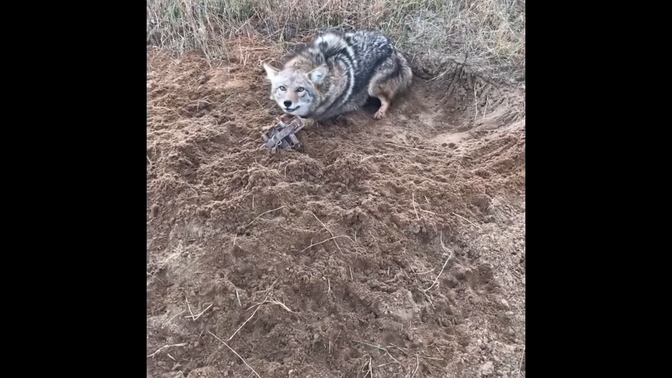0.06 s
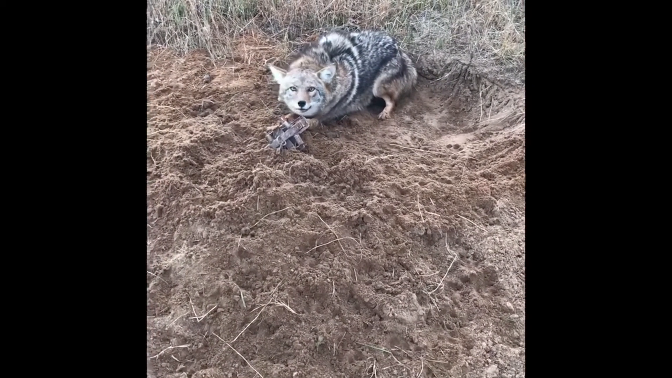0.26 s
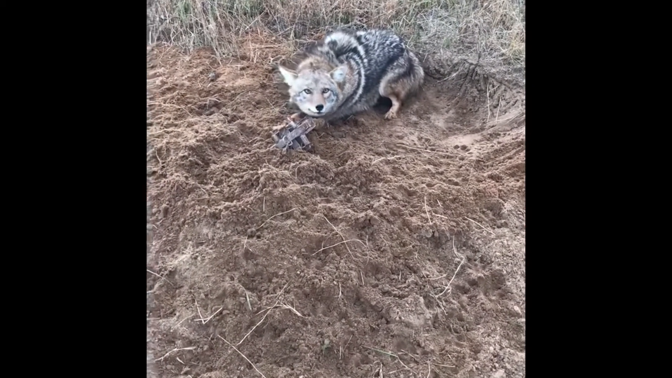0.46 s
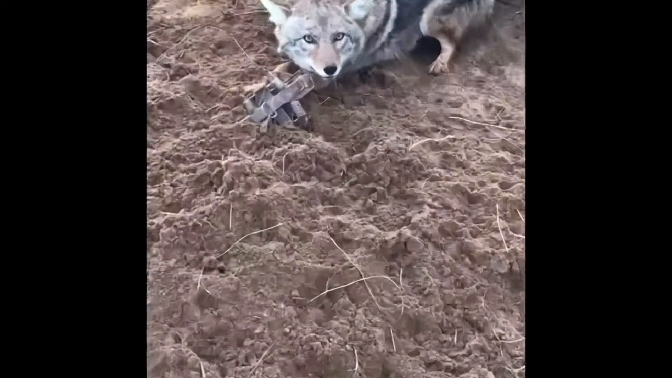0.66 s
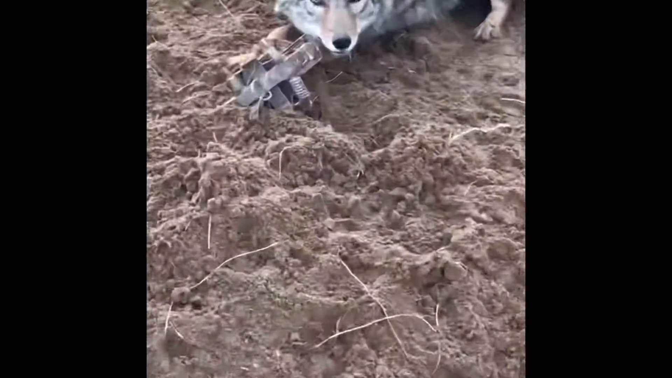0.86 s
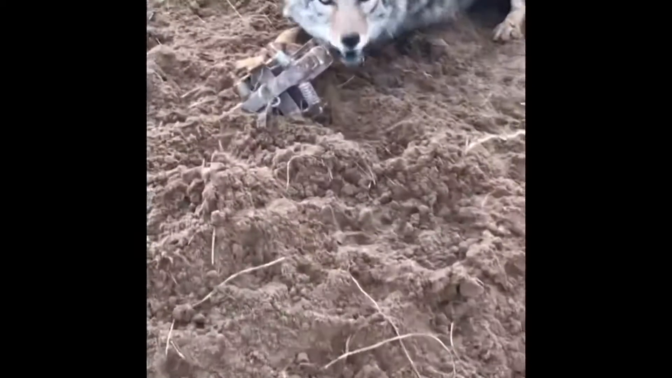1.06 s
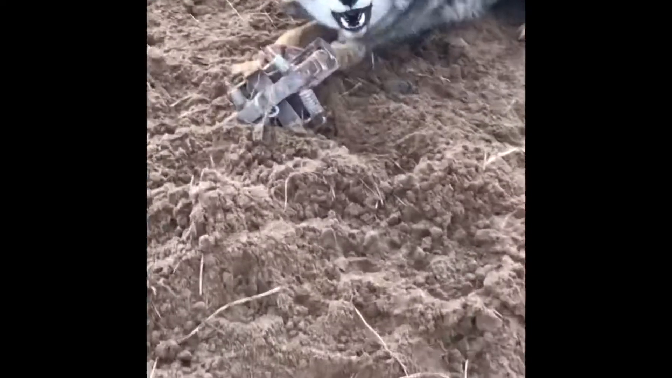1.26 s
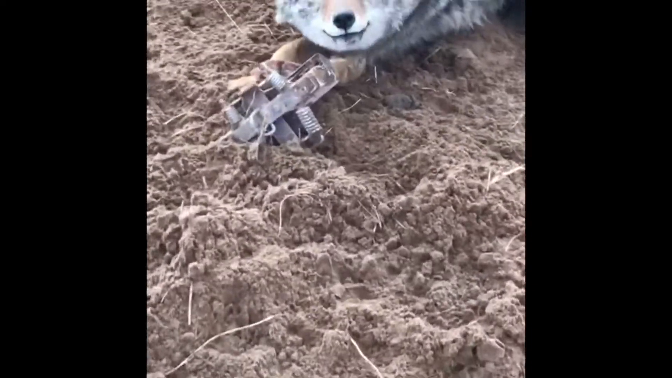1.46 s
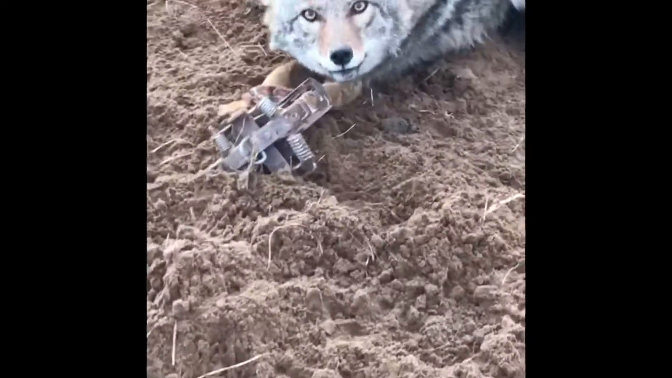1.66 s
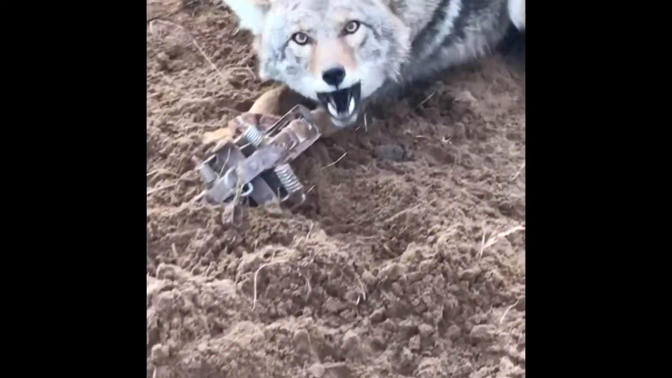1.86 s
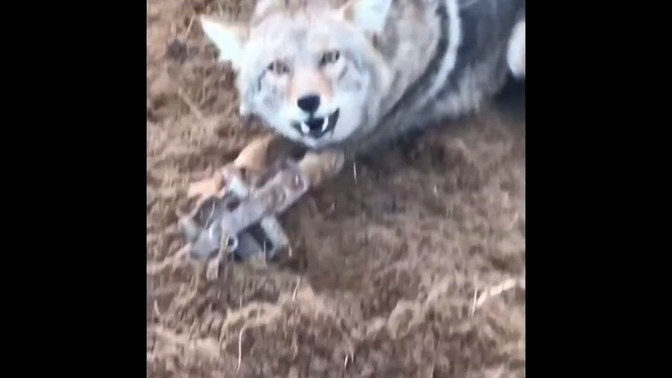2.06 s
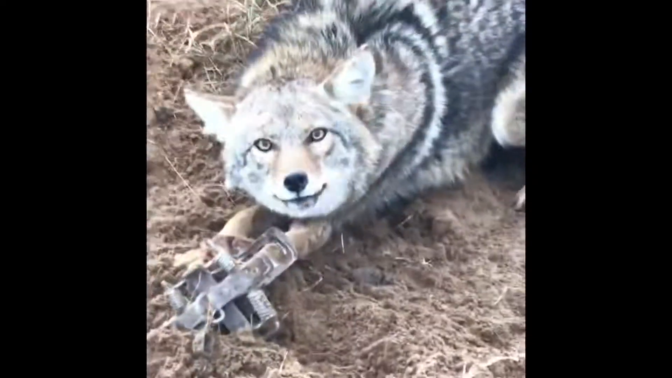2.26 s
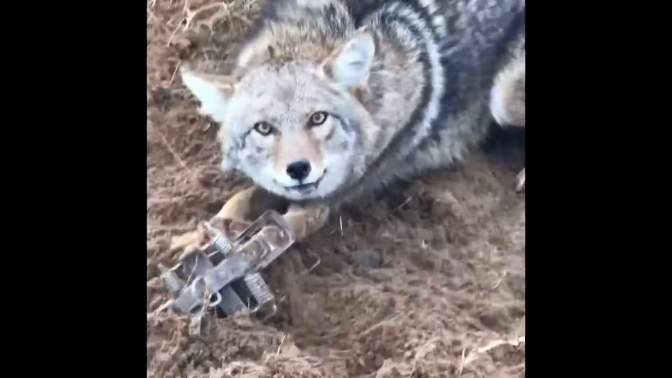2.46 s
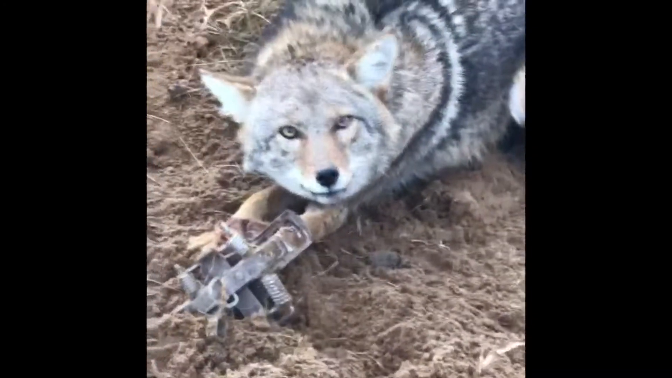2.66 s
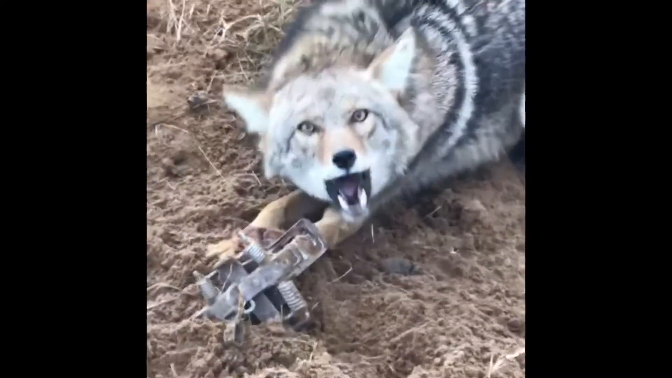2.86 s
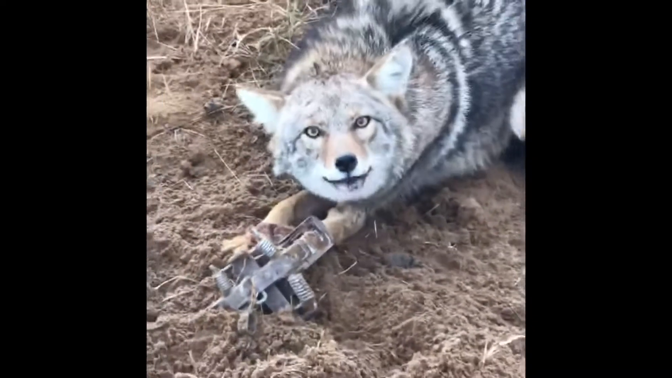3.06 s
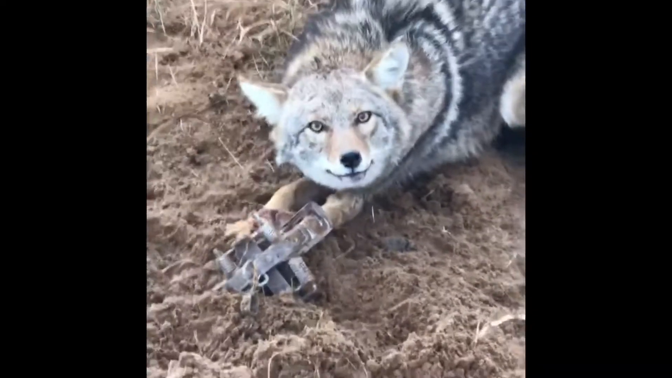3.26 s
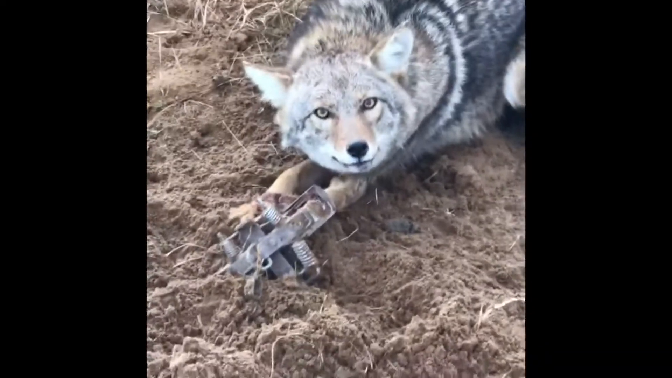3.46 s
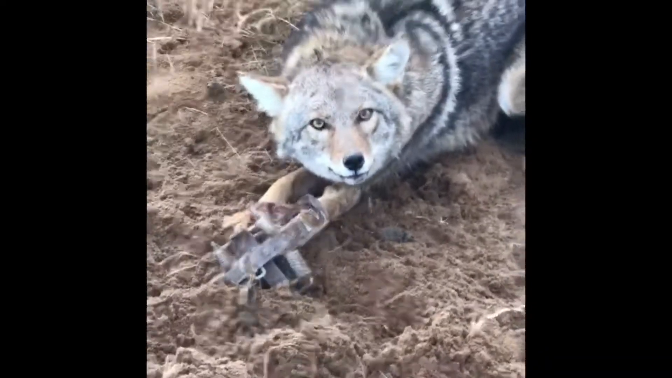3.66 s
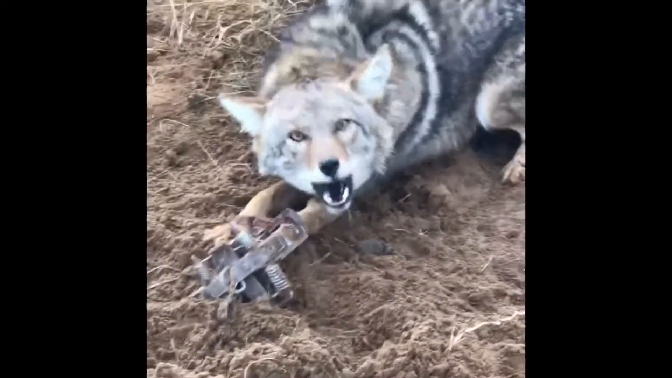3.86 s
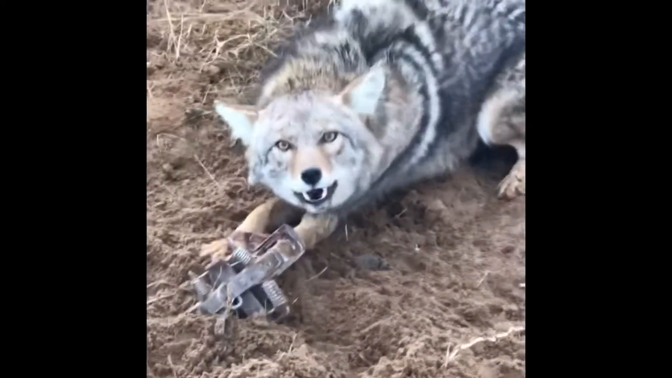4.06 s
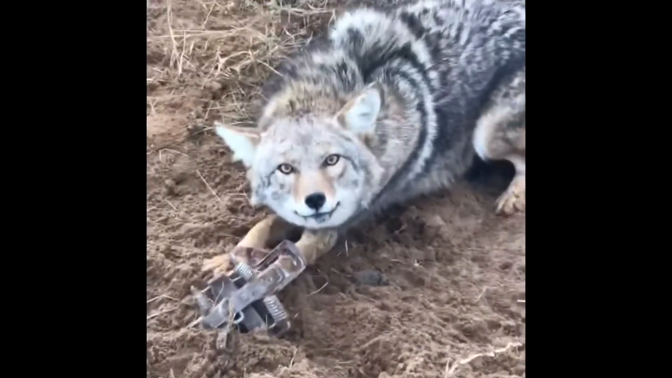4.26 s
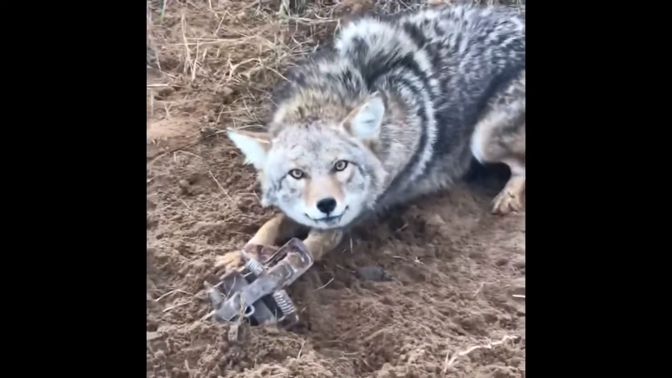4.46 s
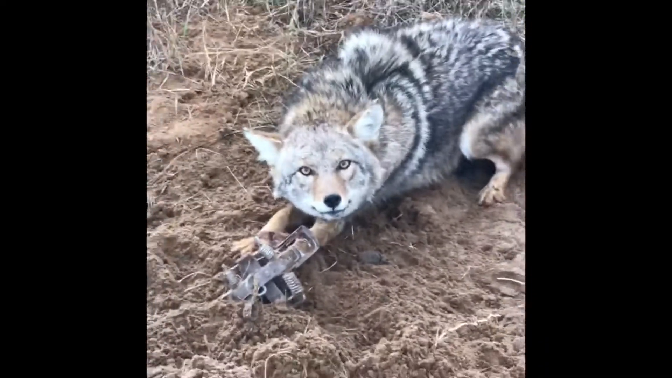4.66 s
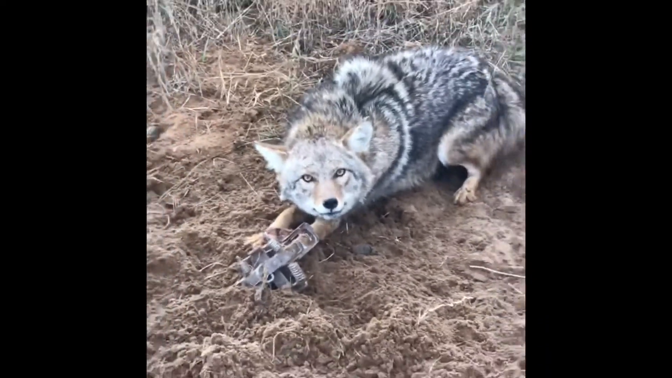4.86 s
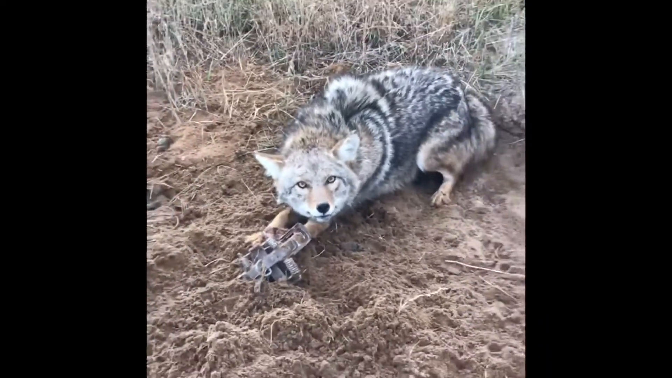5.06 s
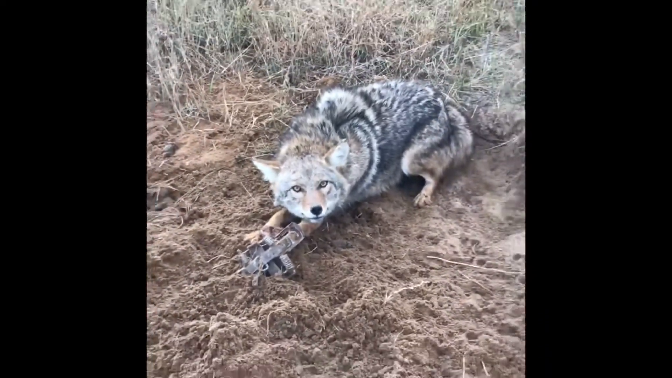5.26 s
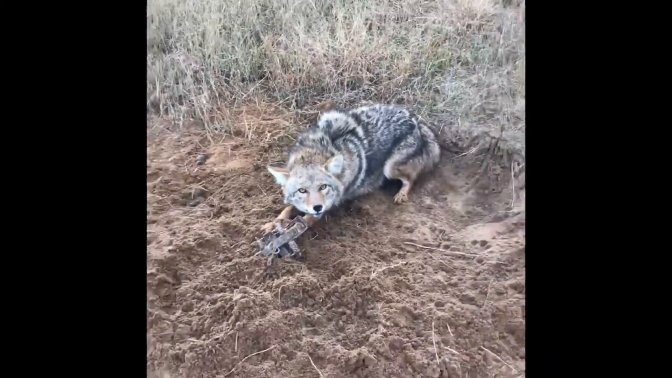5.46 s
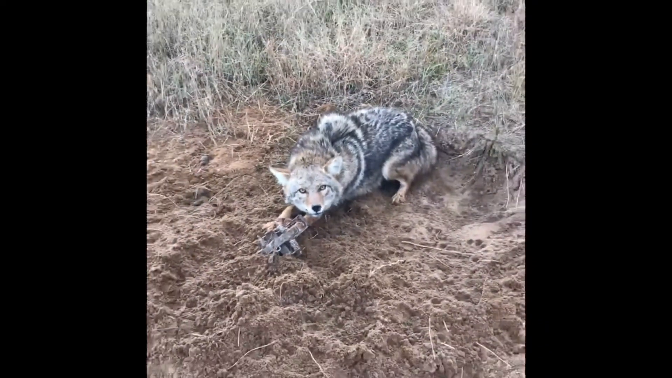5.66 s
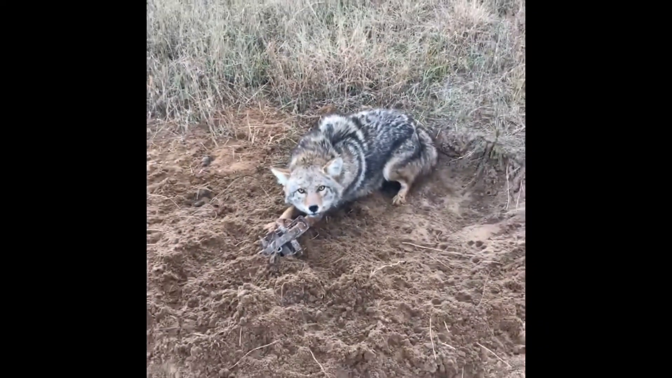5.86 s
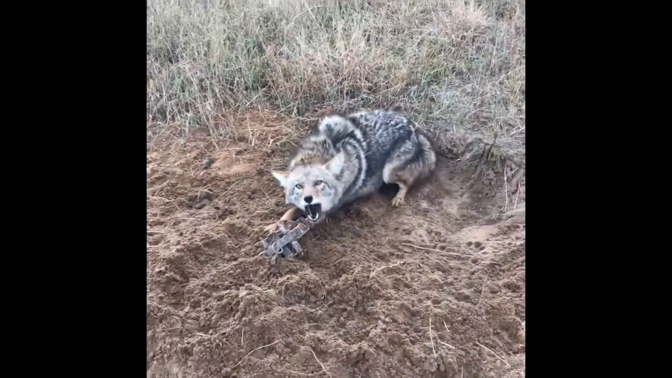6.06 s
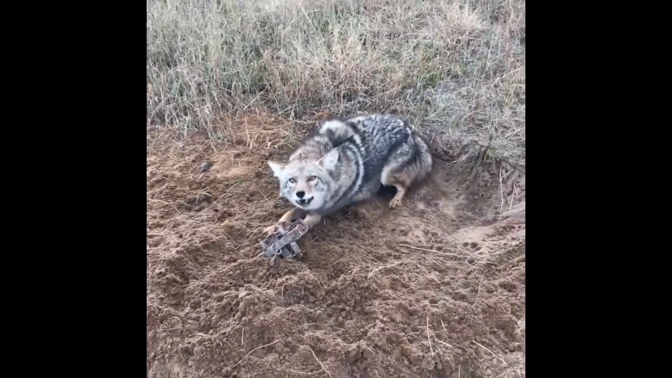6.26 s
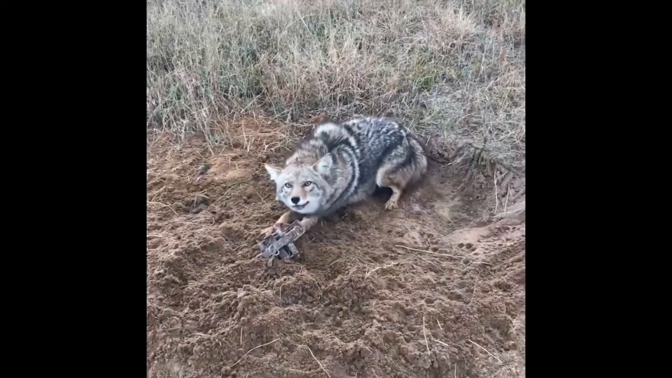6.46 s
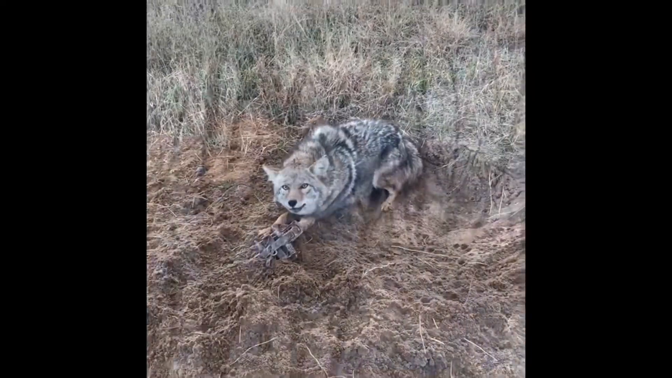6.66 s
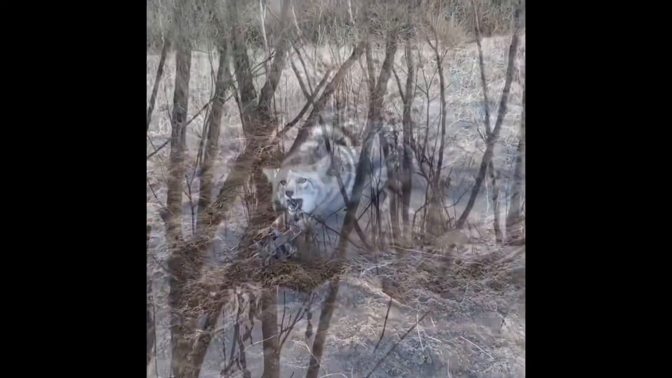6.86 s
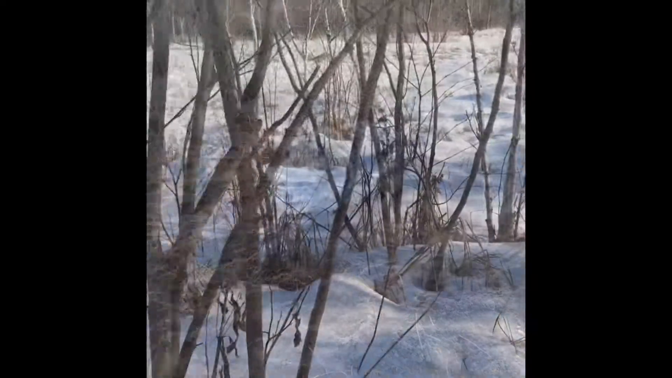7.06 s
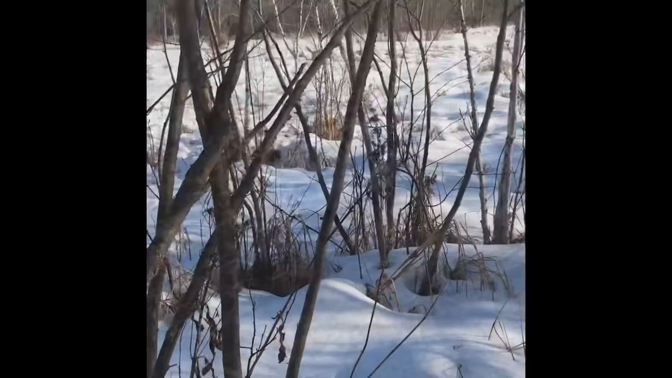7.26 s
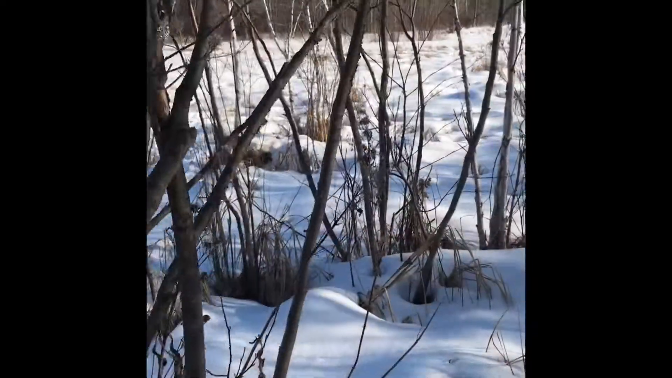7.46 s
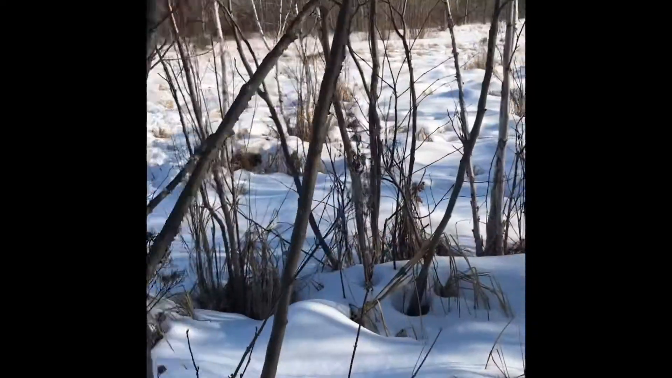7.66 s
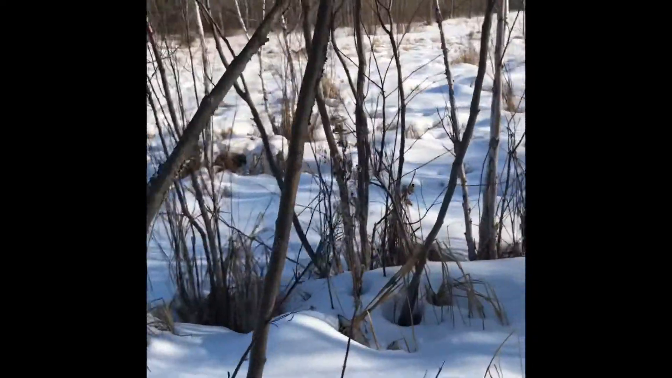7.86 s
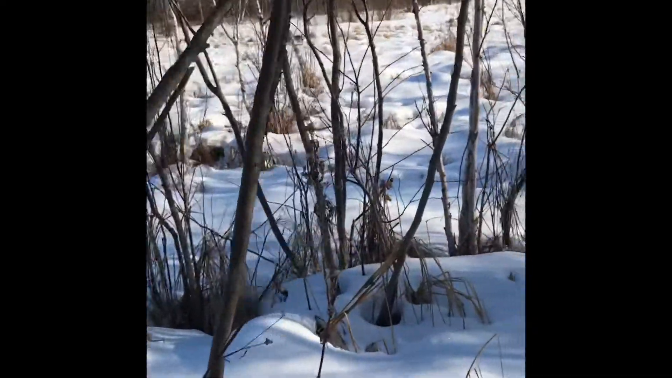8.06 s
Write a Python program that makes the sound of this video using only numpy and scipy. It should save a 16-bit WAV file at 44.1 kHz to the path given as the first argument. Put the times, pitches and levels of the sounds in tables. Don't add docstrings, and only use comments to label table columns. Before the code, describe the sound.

A trapped coyote close to a hand-held phone in an open field barks six times, each a brief yelping burst, first hoarse, then clearer, later hoarse again. Very quiet chesty growls and small throat creaks fill the gaps. Far road roar, low wind and faint dry grass dip at each bark. A strong air puff thumps the microphone after the first bark. Finally the field fades and snow crust crunches with snapping twigs.

```python
import sys
import numpy as np
from scipy import signal
from scipy.fft import rfft, irfft
from scipy.io import wavfile
from scipy.ndimage import uniform_filter1d

SR = 44100
rng = np.random.default_rng(int(sys.argv[2]) if len(sys.argv) > 2 else 0)


def digitize_waveform(pressure):
    field = np.atleast_2d(pressure).T
    bounded = np.clip(field, -1, 1)
    quanta = np.round(bounded * 32767).astype(np.int16)
    wavfile.write(sys.argv[1], SR, quanta)


def decibels_to_gain(level_db):
    exponent = np.asarray(level_db, float) / 20
    return 10 ** exponent


N = 357647

# start in seconds, length in seconds, effort in dB, highest pitch in Hz, hoarseness (0-1).
BARK_EVENTS = [
    (1.047, .17, -8, 449.3, 0.96),
    (1.811, 0.19, -10, 478.8, .13),
    (2.715, .18, -11.5, 478, 0.02),
    (3.81, 0.17, -11, 437.8, 0),
    (5.989, .17, -8, 472, .75),
    (6.698, 0.18, -13.5, 458.4, .17),
]


def evened(x):
    return x / np.sqrt(np.mean(x ** 2) + 1e-20)


def add(mix, s, sound):
    part = mix[round(s * SR):][:len(sound)]
    part += sound[:len(part)]


def smooth(x, s):
    size = max(round(s * SR), 1)
    return uniform_filter1d(uniform_filter1d(x, size), size)


def course(table, share):
    at, *columns = np.transpose(table)
    return np.array([smooth(np.interp(share, at, c), 0.001) for c in columns])


def level_curve(table):
    s, db = np.transpose(table)
    return np.interp(np.arange(N) / SR, s, db)


def tents(rows):
    t = np.arange(N) / SR
    total = np.zeros(N)
    for s, db, rise, fall in rows:
        below = np.where(t < s, (s - t) / max(rise, .003), (t - s) / max(fall, .003))
        total += decibels_to_gain(db - 20 * below)
    return total


def resonate(x, hz, width_hz):
    turn = np.exp(2j * np.pi * np.cumsum(hz * np.ones(len(x))) / SR)
    r = np.exp(-np.pi * width_hz / SR)
    return 2 * (turn * signal.lfilter([1 - r], [1, -r], x / turn)).real


def narrow(x, hz, width_hz):
    return resonate(resonate(x, hz, width_hz), hz, width_hz)


def colour(x, spectrum):
    f, db = np.transpose(spectrum)
    hz = np.fft.rfftfreq(len(x), 1 / SR)
    gain = decibels_to_gain(np.interp(np.log(hz + 1), np.log(f), db))
    return evened(irfft(rfft(x) * gain, len(x)))


def patchy_noise(patchy_db, flicker_db):
    frames = N // 128 + 8
    a, b, patches = rng.standard_normal((frames, 257, 3)).T
    patches = evened(uniform_filter1d(uniform_filter1d(patches, 5, 0), 24, 1))
    flicker = evened(uniform_filter1d(rng.standard_normal(frames), 12))
    frames_out = (a + 1j * b) * decibels_to_gain(patchy_db * patches + flicker_db * flicker)
    return signal.istft(frames_out, nperseg=512, noverlap=384)[1][256:N + 256]


def pulses(hz, rough, jitter, shimmer_db):
    a, b = rng.standard_normal((2, len(hz)))
    turns = np.cumsum(hz * (1 + jitter * rough * evened(smooth(a, .0016)))) / SR
    train = sum(np.cos(2 * np.pi * k * turns) * (k * hz < 16000) for k in range(1, 56))
    return turns, evened(train) * decibels_to_gain(shimmer_db * rough * evened(smooth(b, 0.0025)))


def bark(length, effort_db, top_hz, hoarse):
    # Hz, width in Hz, level in dB, how far it follows the mouth,
    # dB lost per dB of weaker effort.
    throat = [(620, 250, -1, 1.0, .01), (1170, 340, 2.5, .18, .04), (1740, 440, -4.5, .3, .06),
              (2330, 520, -6, .08, .3)]
    # Hz, width in Hz, level in dB,
    # how far it follows the pitch, dB lost per dB of weaker effort.
    upper = [(3023, 290, -22, .1, 1.3), (4140, 610, -23.5, 0.31, 1), (6404, 760, -22, .4, 0.5),
             (8620, 1220, -23, 0.37, 1.27), (10300, 900, -33, 0.37, 0.8), (11400, 1600, -36, .1, 1.85),
             (13600, 2100, -30.5, .1, 3)]
    # share of length, level in dB against effort, share of top pitch, mouth opening factor.
    clear_course = [(0, -51, .55, .6), (.13, -16.5, .64, .72), (.2, -4.5, .73, .87), (.37, -1, .9, .96),
                    (.47, 0.5, 0.98, 1.15), (.57, 1.5, .93, 1.3), (.72, 0, .7, 1.18),
                    (.81, -19.5, .63, 1.25), (1, -48, .63, 1.1)]
    hoarse_course = [(0, -52, .66, .68), (.1, -12, .8, .6), (.21, -3.5, .93, .85), (.33, -2.5, .99, .93),
                     (.42, 0.84, 1, 1.01), (.56, -1, .94, 1.05), (.74, -6, .8, 1.15), (.84, -24, .7, 1.2),
                     (1, -62, .66, 1.4)]
    voicing = [(0, .65, .7, .4, .4), (.2, .5, .85, .35, .6), (.38, .4, .65, .5, .95),
               (.46, .03, .12, .45, .95), (.63, .02, .05, .55, .6), (.7, .25, .2, .35, .55),
               (.83, .75, .2, .8, .2), (1, .9, .1, .98, .1)]

    t = np.arange(0, length, 1 / SR)
    share = t / length
    hoarse = np.clip(hoarse, 0, 1)
    clear_part = (1 - hoarse) * course(clear_course, share)
    under_db, pitch, mouth = clear_part + hoarse * course(hoarse_course, share)
    level_db, hz = effort_db + under_db, top_hz * pitch

    delay = .55 * min(hoarse, .2) * np.exp(-((share - .5) / .1) ** 2)
    clear_rough, clear_second, hoarse_rough, hoarse_second = course(voicing, share - delay)
    rough = clear_rough + hoarse * (hoarse_rough - clear_rough)
    second = clear_second + hoarse ** 4 * (hoarse_second - clear_second)

    turns, folds = pulses(hz, rough, jitter=.17, shimmer_db=10.0)
    breaking = .9 * (1 - hoarse) * np.exp(-((share - .69) / .045) ** 2)
    first_hz = throat[0][0]
    locked = pulses(first_hz * np.minimum(mouth, 1.08), rough, jitter=.07, shimmer_db=5.5)[1]
    breath = evened((0.94 + np.exp(-(turns % 1) / .3)) * rng.standard_normal(len(t)))
    locked = .35 * locked + narrow(locked, first_hz * mouth, width_hz=400)
    drive = (1 - .5 * second) * (1 + breaking * np.cos(np.pi * turns)) * folds
    drive = drive + 0.76 * second * locked + 1.7 * rough * breath

    voice = -decibels_to_gain(-3.5 - 24 * (mouth - 0.7951)) * narrow(folds, hz, width_hz=170)
    for k, (f_hz, width_hz, db, follows, fades) in enumerate(throat):
        ring_db = db + fades * (level_db - 13.5)
        if k == 3:
            ring_db = ring_db + 15 * (mouth - 1.01)
        sign = -1 if k >= 2 else 1
        voice -= sign * decibels_to_gain(ring_db) * narrow(drive, f_hz * mouth ** follows, width_hz)
    loudness = np.sqrt(smooth(voice ** 2, 0.009) + 1e-9)
    voice = voice / loudness
    voice = voice - .24 * voice ** 2
    voice = signal.sosfilt(signal.butter(5, 228, "high", fs=SR, output="sos"), voice)
    voice = signal.sosfiltfilt(signal.butter(3, 2800, fs=SR, output="sos"), voice)

    larynx = np.clip(np.interp(t - .015, t, hz), 330, 470) / 400
    bright_drive = 0.86 * drive + (0.42 + 0.31 * rough) * breath
    weaker_db = np.maximum(level_db + 8.5, np.where(t > length / 2, -12, -60))
    for f_hz, width_hz, db, follows, fades in upper:
        patches_db = 2.9 * evened(smooth(rng.standard_normal(len(t)), 0.0084))
        ring = narrow(bright_drive, f_hz * larynx ** follows, width_hz)
        dull_db = -5.5 * hoarse * max(np.log2(f_hz / 4000), 0)
        voice -= decibels_to_gain(db + 1.0 + dull_db + patches_db + fades * weaker_db) * ring / loudness
    voice = voice - np.clip(3 * (mouth - .9), 0, 1) * resonate(voice, 5350, width_hz=280)
    return decibels_to_gain(level_db + 0.49) * voice


def coyote():
    barks = np.zeros(N)
    for s, *row in BARK_EVENTS:
        add(barks, s, bark(*row))
    t = np.arange(6000) / SR
    scatter = rng.standard_normal(6000) * decibels_to_gain(-60 * t / 0.14) * (t > .006)
    scatter = signal.lfilter([.3], [1, -.7], scatter)
    return barks + decibels_to_gain(-28.0) * signal.oaconvolve(barks, scatter / np.linalg.norm(scatter))[:N]


def growl():
    # start in seconds, length in seconds, level in dB,
    # first and last pulse rate in Hz.
    growl_events = [
        (1.42, 0.39, -51.5, 48.43, 63.45),
        (2.02, 0.65, -52, 53, 64.44),
        (2.95, .85, -56, 54.3, 68.34),
        (4.05, 1.92, -56.5, 56.33, 58.96),
        (6.22, 0.53, -52, 45.26, 67.7),
    ]
    # Hz, width in Hz, level in dB, share of the lips' effect.
    chest = [(111.5, 59, -0.5, 1), (167, 85, 2, 0), (243, 154, 6.5, 1), (370, 130, -12.5, 0.67)]
    out = np.zeros(N)
    for s, length, level_db, first_hz, last_hz in growl_events:
        t = np.arange(0, length, 1 / SR)
        hz = first_hz + (last_hz - first_hz) * t / length
        db = level_db - 7.5 * np.exp(-t / 0.12) + 3.5 * t / length
        lips_db = 3.5 - 14.5 * length + 8 * (2 * t / length - 1) ** 2
        turns = np.cumsum(hz * (1 + .01 * evened(smooth(rng.standard_normal(len(t)), .02)))) / SR
        train = sum(np.cos(2 * np.pi * k * turns) for k in range(1, 10))
        hum = np.zeros(len(t))
        for f_hz, width_hz, top_db, share in chest:
            hum += decibels_to_gain(top_db + share * lips_db) * narrow(train, f_hz, width_hz)
        add(out, s, decibels_to_gain(db) * evened(hum) * signal.windows.tukey(len(t), .1))
    return out


def all_ticks():
    # time in seconds, peak in
    # dB, pitch in Hz.
    grit = [(0.406, -50, 4500), (.4065, -55, 6600), (.407, -54, 8800), (.611, -54, 13000),
            (0.6168, -58, 3200), (.644, -49.5, 6030), (0.694, -57, 8600), (1.1994, -46, 3950),
            (5.1295, -47, 3140), (6.1435, -36.5, 3730), (6.289, -58, 3470), (6.3297, -61, 2920),
            (6.9086, -50, 8340)]
    # first closure in seconds, peak in dB, first gap in seconds,
    # growth factor of the gap, dB change per closure.
    creaks = [
        (1.9754, -47.5, .013, 1.2, 0.5),
        (2.0594, -51, .0174, 1.01, -0.5),
        (2.8624, -41, .012, 1.243, -3),
        (3.9624, -44, .014, 1.2, -5),
        (6.861, -46, .013, 1.2, -4),
    ]
    creak_counts = [3, 5, 5, 2, 3]
    # time in seconds, peak in dB.
    twigs = [(6.9517, -50), (7.0504, -48), (7.0691, -44), (7.1392, -63), (7.2418, -58), (7.2995, -47),
             (7.3354, -47), (7.3987, -43), (7.4375, -32), (7.5679, -51), (7.6274, -59), (7.6894, -32),
             (7.8199, -28), (7.8244, -33), (7.9174, -43), (7.9463, -42), (8.0107, -57), (8.0371, -46)]
    rows = []
    for (s, db, gap, growth, step_db), count in zip(creaks, creak_counts):
        for k in range(count):
            wait = gap * sum(growth ** j for j in range(k))
            rows.append((s + wait, db + k * step_db, 3700))
    rows = np.array(rows + [(s, db, 3314) for s, db in twigs])
    rows = rows * (1 + rng.uniform(-1.1, 1, (len(rows), 1)) * [0, 0, 0.043])
    return np.vstack([grit, rows])


def ticks():
    out, t = np.zeros(N), np.arange(900) / SR
    for s, db, hz in all_ticks():
        snap = rng.standard_normal(900) * np.exp(-t / 0.00068) * (1 - np.exp(-t / 0.00025))
        bright = 0.048 + .5 * (db > -35)
        tick = narrow(snap, hz, width_hz=1500) + bright * narrow(snap, 6100, width_hz=1900) + .03 * snap
        add(out, s, decibels_to_gain(db) * tick / abs(tick).max())
    return out


def snow():
    # peak time in seconds, level in dB, then load and settle time
    # in seconds per 20 dB.
    steps = [
        (6.91, -69, 0.022, 0.046),
        (7.1, -65.5, 0.33, 0.12),
        (7.31, -63.5, .2, 0.23),
        (7.402, -46.5, .004, 0.093),
        (7.445, -37.5, 0.038, 0.13),
        (7.6, -59.5, .1, 1.4),
        (7.71, -54, 0.045, .25),
        (7.82, -54, 0.011, 0.047),
        (8.04, -54, .005, 0.024),
    ]
    # Hz, level in dB.
    crunch_spectrum = [(100, -23), (200, 0.5), (450, -5.5), (1200, -11), (2500, -17), (3800, -14.5),
                       (4900, -24.5), (6500, -21), (8000, -28.5), (9200, -25.5), (10600, -33.5),
                       (12500, -30), (16000, -34)]
    load = tents(steps)
    hits = (rng.random(N) < 500 / SR) * decibels_to_gain(1.5 * np.minimum(rng.exponential(1, N), 4))
    grains = rng.standard_normal(N) * signal.lfilter([1], [1, -.985], hits)
    crunch = colour(evened(grains) + 1.2 * rng.standard_normal(N), crunch_spectrum) * decibels_to_gain(5.5)
    body = evened(narrow(grains, 241, width_hz=600)) * (decibels_to_gain(-56.5) + decibels_to_gain(-4) * load)
    woods_s = 6.88
    return (crunch * load + body) * (np.arange(N) > woods_s * SR)


def puffs():
    # start in seconds, peak in dB, length in seconds.
    puff_events = [
        (1.255, -21.5, 0.055),
        (1.359, -12.5, 0.028),
        (1.384, -6.5, 0.023),
        (1.645, -30, 0.027),
        (2.499, -27, 0.023),
        (8.034, -45, 0.035),
    ]
    puff_spectrum = [(20, -11.5), (80, 2.0), (300, -10), (700, -36.0), (1500, -88)]  # (Hz, dB)
    out = np.zeros(N)
    for s, db, length in puff_events:
        u = np.arange(4000) / SR / length
        burst = colour(rng.standard_normal(4000), puff_spectrum)
        add(out, s, decibels_to_gain(db - 9.5) * burst * 3 * u * np.exp(1 - 3 * u))
    return out


def grass():
    # Hz, level in dB.
    rustle_spectrum = [(1500, -27.5), (2800, 0.5), (4300, -0.5), (5500, -6), (8000, -13), (16000, -18)]
    # peak time in seconds, level in dB, then swell and settle time in seconds per 20 dB.
    stirs = [
        (.3, -70, 3.0, 1.6),
        (.7, -76, 1.2, 0.59),
        (1.24, -65.5, .05, 0.088),
        (2.02, -68.5, .05, 0.13),
        (2.95, -72.5, .05, .18),
        (4.7, -75, 0.89, 3.0),
        (5.6, -75, 0.76, 1.4),
    ]
    rustle = colour(patchy_noise(patchy_db=1.5, flicker_db=-2.5), rustle_spectrum)
    return rustle * decibels_to_gain(-1.0) * tents(stirs) * (np.arange(N) < 6.1 * SR)


def field():
    # Hz, level in dB.
    road_spectrum = [(150, -37), (250, -9), (324, -15), (443, -11), (508, -11), (947, 1.5), (1320, -1.5),
                     (1680, -7), (1930, -12.5), (2870, -27), (7690, -57), (12500, -51), (15600, -58.5)]
    # time in seconds, level in dB.
    road_level = [(0.0, -48), (1.0, -46.5), (2.3, -45), (3.3, -47), (4.7, -48), (6.4, -46.5), (6.7, -50.5),
                  (6.9, -54.5), (7.63, -58), (8.11, -63)]
    # Hz, level in
    # dB.
    rumble_spectrum = [(20, -40.5), (40, -6), (62, 2), (105, -1.5), (165, -10), (220, -15.5), (280, -23),
                       (400, -32.5), (900, -72.5)]
    # time in seconds, level in dB.
    wind_level = [(0.0, -42.5), (.3, -44), (.4, -47), (1.0, -46), (1.39, -30), (1.5, -37.5), (1.8, -29.5),
                  (2.08, -42), (2.52, -41.5), (2.66, -39), (3.27, -46.5), (3.78, -42.5), (5.0, -43.5),
                  (6.6, -42), (6.98, -51.5), (7.34, -62), (7.47, -52), (7.8, -69)]
    road = colour(patchy_noise(patchy_db=2.17, flicker_db=.5), road_spectrum)
    road = road * decibels_to_gain(level_curve(road_level) + 1.5)
    wind = colour(patchy_noise(patchy_db=0.85, flicker_db=1.5), rumble_spectrum)
    wind = wind * decibels_to_gain(level_curve(wind_level) + 0.2)
    return road + grass() + wind


def ducking(loud):
    power_db = 10 * np.log10(smooth(loud ** 2, .008) + 1e-12)
    fall = np.arange(N) * 27.0 / SR
    over_db = np.maximum(np.maximum.accumulate(power_db + fall) - fall + 16.5, 0)
    since = np.arange(N) / SR - np.array([[s + .75 * length] for s, length, *_ in BARK_EVENTS])
    sag_db = 6.5 * (np.exp(-abs(since) / 0.12) * (since > 0)).sum(0)
    return decibels_to_gain(-smooth(0.34 * over_db + sag_db, .006))


def scene():
    dog = coyote()
    return (dog + growl() + ducking(dog) * field() + puffs() + ticks() + snow())[None]


def top_cut(x):
    return signal.sosfilt(signal.butter(12, 15780, fs=SR, output="sos"), x)


def record(dry):
    hissy = dry + decibels_to_gain(-75.5) * rng.standard_normal(dry.shape)
    limited = hissy / (1 + hissy ** 6) ** (1 / 6)
    return top_cut(limited)


dry = scene()
out = record(dry)
digitize_waveform(out)
```